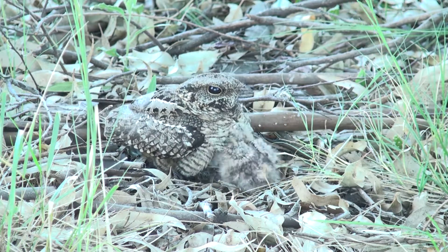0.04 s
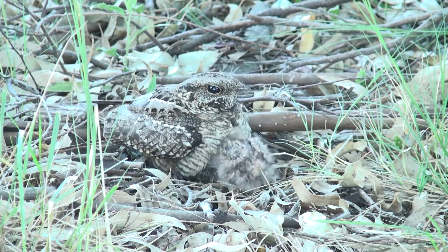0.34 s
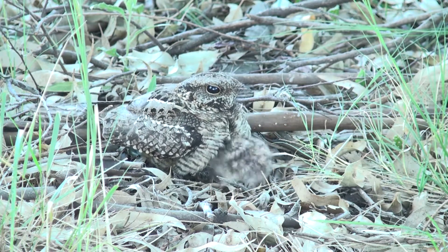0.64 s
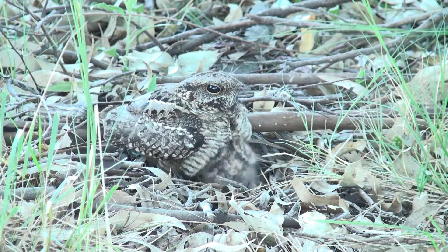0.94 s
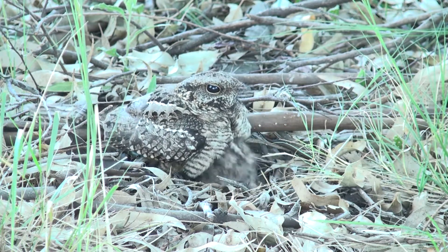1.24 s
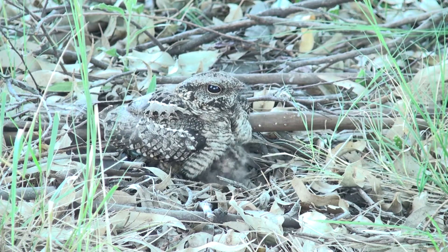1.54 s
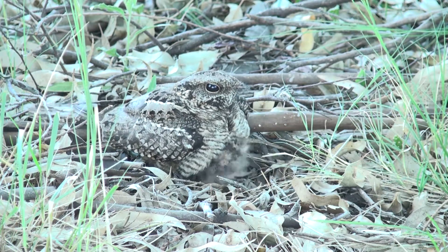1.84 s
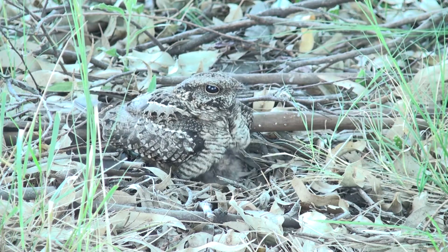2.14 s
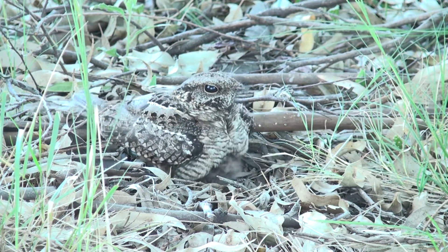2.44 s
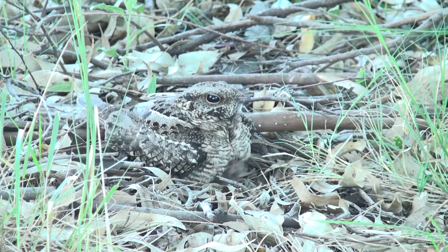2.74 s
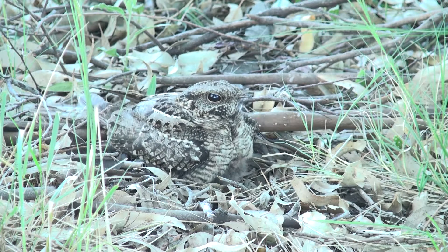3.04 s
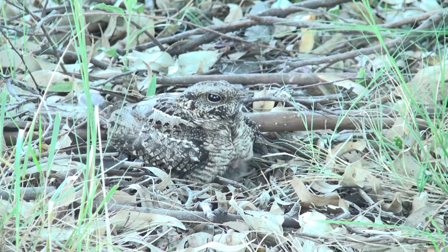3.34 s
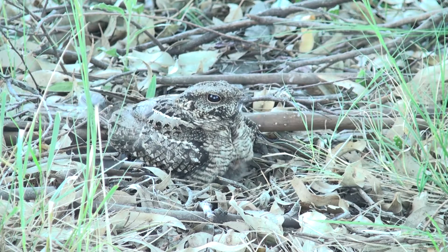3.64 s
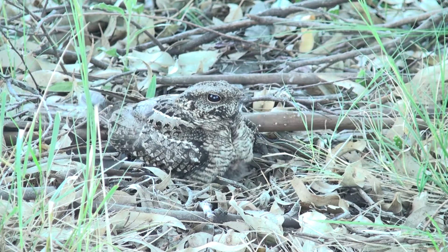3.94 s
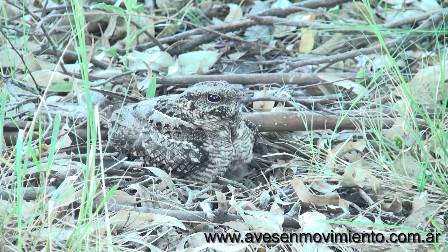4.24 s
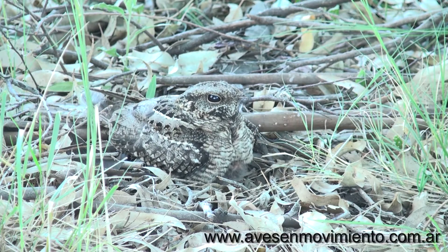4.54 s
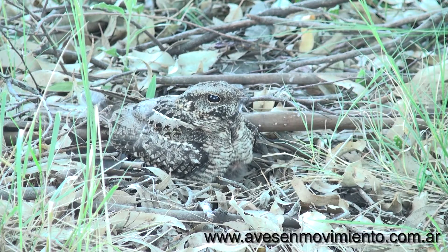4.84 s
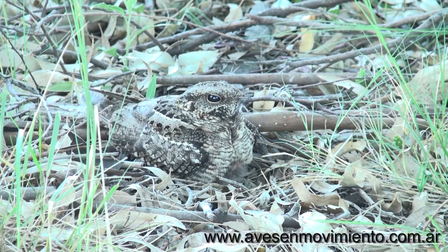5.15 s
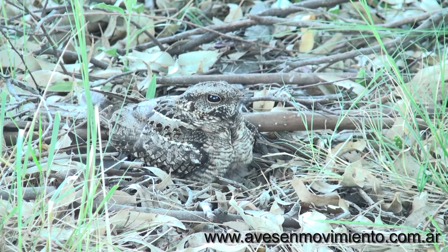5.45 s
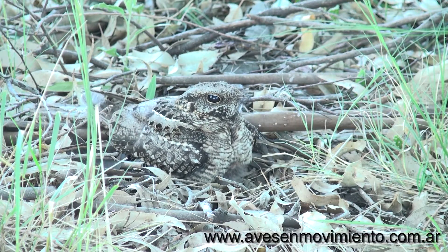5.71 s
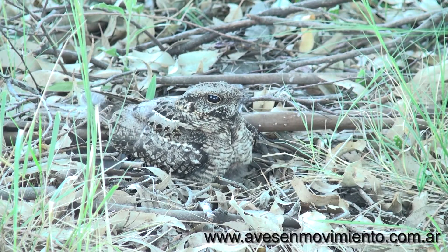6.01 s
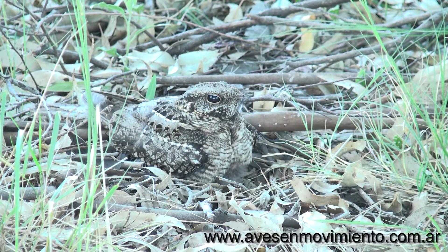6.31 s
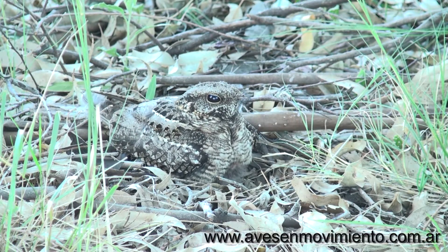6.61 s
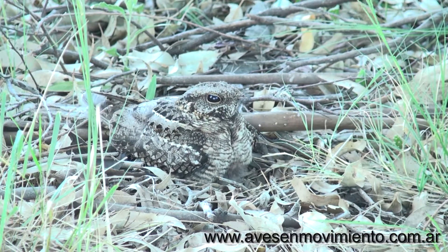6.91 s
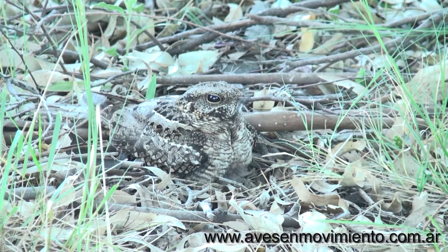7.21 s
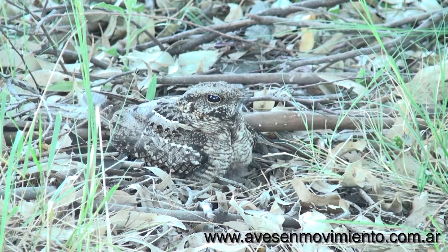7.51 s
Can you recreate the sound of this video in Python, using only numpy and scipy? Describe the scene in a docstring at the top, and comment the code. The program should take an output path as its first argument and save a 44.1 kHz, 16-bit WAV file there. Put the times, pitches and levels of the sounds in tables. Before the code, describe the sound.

Faint far birds whistle and trill over steady insects, then a nearby bird clucks rapidly as a light breeze rumbles.

```python
"""Nightjar on the woodland floor

Close to the microphone, a nightjar on the leaf litter gives eleven quick, arching clucks: pulses of
its syrinx ringing in the throat. Before it, far birds whistle and trill. A cricket, an insect chorus
and a faint low drone carry on throughout, and in the second half a breeze rumbles on the microphone."""
import sys
import numpy as np
from scipy import signal
from scipy.fft import rfft, irfft, next_fast_len
from scipy.io import wavfile
from scipy.ndimage import map_coordinates

SR = 44100
rng = np.random.default_rng(int(sys.argv[2]) if len(sys.argv) > 2 else 0)


def digitize_waveform(pressure):
    """Quantize a signal to 16-bit integers and store it at the path in sys.argv[1].

    Rows of a 2-D input are taken as channels; values are limited to [-1, 1].
    """
    field = np.atleast_2d(pressure).T
    bounded = np.clip(field, -1, 1)
    quanta = np.round(bounded * 32767).astype(np.int16)
    wavfile.write(sys.argv[1], SR, quanta)


N = 338247

# Reverberation among the trees. Each row: frequency in Hz, seconds to die away by 60 dB.
TREE_DECAY = [(300, 1), (4000, 0.45), (8000, 0.47), (15000, 0.53)]
# Diffuse sound at the microphone. Each row: frequency in Hz, left-right correlation.
DIFFUSE_LIKENESS = [(60, 0.26), (150, 0.57), (380, 0.63), (950, 0.085), (2380, -0.077), (5980, 0.27),
                    (15000, 0.26)]


def nightjar(notch_hz=4385, notch_width_hz=36, notch_depth=0.79):
    """Close by, clucks ring in the bird's throat; the leaf litter and the trees answer."""
    # Each row: start, rise time and end in seconds, nominal top pitch in Hz, relative level in dB,
    # pitch drift across the cluck as a share, swell across it in dB.
    clucks = [(5.078, 0.015, 5.204, 2236, -14, 0.049, 4.5), (5.302, .015, 5.409, 2265, -12.5, -0.027, 6),
              (5.541, .018, 5.645, 2234, -12, -0.02, -5), (5.793, 0.019, 5.901, 2192, -13, 0.014, -0.5),
              (6.048, 0.021, 6.154, 2197, -11, -0.023, -2), (6.295, 0.017, 6.402, 2190, -11, 0, -2.5),
              (6.542, 0.019, 6.652, 2156, -11.5, 0.013, -0.5), (6.779, 0.018, 6.887, 2142, -12, .02, -3),
              (7.010, 0.02, 7.121, 2129, -10, -.015, -2.5), (7.256, 0.02, 7.360, 2103, -12.5, 0.021, 0.5),
              (7.515, 0.015, 7.616, 1945, -12, -0.11, -1.5)]
    # Resonance of the throat and open bill. Each row: frequency in Hz, gain in dB.
    throat = [(500, -14), (1200, -15.5), (1700, -16.5), (2200, -17.5), (2550, -12.5), (3100, -0.5),
              (3550, -1.5), (4200, 1), (4550, -1.2), (4900, -8), (5400, -14.5), (6500, -13), (7400, -23),
              (8700, -22.5), (10500, -33.5), (13000, -30.5), (15000, -33.5), (16000, -63)]
    # Echo off the leaf litter. Each row: frequency in Hz, seconds to die away by 60 dB.
    litter_decay = [(300, 0.27), (4000, 0.088), (8000, 0.13), (15000, 0.12)]
    # Dry leaves throw back the short waves best. Each row: frequency in Hz, gain in dB.
    leaf_echo = [(2000, -8.5), (3200, -4), (3900, -6), (4400, -10), (5400, 1.5), (6500, -5.5),
                 (10000, 5), (14000, -9)]
    # The microphone's two ports. Each row: frequency in Hz, left minus right in dB.
    balance = [(2000, 1), (3600, 3.5), (4000, -1), (4230, 1.5), (4450, 2), (6500, 1), (8700, -4.5),
               (14000, -4.5)]
    # Each row: frequency in Hz, radians by which the left port leads.
    lead = [(1000, 0.27), (2150, 0.39), (4400, -0.35), (6500, -0.45), (8800, -1.2), (12000, -0.026)]

    def direct_path(hz):
        """The strongest partial dips as it glides through a narrow notch; each port hears its share."""
        damping = 1j * hz * notch_width_hz
        notch = 1 - notch_depth * damping / (notch_hz ** 2 - hz ** 2 + damping)
        sides = np.array([[0.5], [-0.5]])
        return notch * amp(sides * along(balance, hz)) * np.exp(1j * sides * along(lead, hz))

    syrinx = np.zeros(N)
    for start_s, rise_s, end_s, top_hz, db, drift, swell_db in clucks:
        add(syrinx, start_s, amp(db) * cluck(end_s - start_s, rise_s, top_hz, drift, swell_db))
    voice = resonate(syrinx, throat)
    thrown = filtered(voice, lambda hz: amp(along(leaf_echo, hz)))
    litter = scatter(thrown, litter_decay, delay_s=0.000989)
    trees = amp(-14.5) * scatter(thrown, TREE_DECAY, delay_s=0.018)
    return filtered(voice, direct_path) + litter + trees


def cluck(length_s, rise_s, top_hz, drift, swell_db, tilt_db=1.46, jitter=0.064, shimmer_db=5, rasp=0.3):
    """Syrinx pulses speed up from clicks into a clean tone, then slow down and roughen."""
    t = np.arange(int(length_s * SR)) / SR
    share, effort_db, rough, treble_db = syrinx_tension(t, rise_s)
    place = t / length_s - 0.5
    sag = 0.03 * (2 * place) ** 2  # the crest is a shallow dome
    pitch = top_hz * share * (1 + drift * place - sag + jitter * rough * wobble(700.6, len(t)))
    phase = 2 * np.pi * (np.cumsum(pitch) / SR - pitch[0] * 0.001)
    harmonic = np.arange(1, 33)[:, None]
    octaves = np.log2(harmonic * pitch / (2 * top_hz))
    partials = (harmonic * pitch < SR / 2) * amp(tilt_db * octaves + treble_db * np.maximum(octaves, 0))
    partials[2:8] *= amp([wobble(119.6, len(t)) for _ in range(6)])  # six overtones waver separately
    pulses = (partials * np.cos(harmonic * phase)).sum(axis=0)
    air_band = signal.butter(2, [3800, 8500], "bandpass", fs=SR)
    air = unit(signal.lfilter(*air_band, rng.standard_normal(len(t))))
    hiss = rasp * np.sqrt(rough) * share * (1 + np.cos(phase)) * air  # air escapes once a cycle
    waver_db = shimmer_db * rough * wobble(900, len(t)) + 0.6 * wobble(88.4, len(t))
    release = np.minimum((length_s - t) / 0.0014, 1)
    return share * amp(effort_db + swell_db * place + waver_db) * release * (pulses + hiss)


def syrinx_tension(t, rise_s, fall_s=0.026, fall_per_s=23, knee_s=0.00302, click_part=0.5):
    """Tension sets share of top pitch, effort, roughness and treble: slow clicks, a leap, a fall."""
    left_s = t[-1] - t
    rise_slack = np.minimum(0.22 * np.exp(1.9 * (1 - t / rise_s)), 0.9)
    fall_slack = fall_per_s * knee_s * np.logaddexp(0, (fall_s - left_s) / knee_s)  # a ramp, eased in
    slack = np.clip(rise_slack + fall_slack, 0, 0.9)
    voiced = np.clip((t / rise_s - click_part) / 0.12 + 0.5, 0, 1)  # clicks give way to tone mid-rise
    share = voiced * (1 - slack) + (1 - voiced) * 0.13
    click_db = np.interp(t / rise_s, [0, click_part], [-9, 1])
    effort_db = -31.5 * voiced * slack ** 2 + (1 - voiced) * click_db
    rough = 0.07 + 0.53 * np.tanh(slack / 0.34)  # clean on the crest, rough at the foot
    # Slack pulses close softly and are dull; those at the downturn snap shut and are bright.
    snap_db = 5 * np.exp(-((left_s - fall_s + knee_s) / 0.016) ** 2)
    treble_db = snap_db - 13.5 * rise_slack - 25 * fall_slack  # per octave
    return share, effort_db, rough, treble_db


def far_birds():
    """Slurred whistles and a trill, blurred by the wood; the trill comes from deeper in the trees."""
    # One bird's falling whistles. Each row: start and length in seconds, relative level and fade in dB.
    whistles = [(1.401, .265, -32.5, 21.5), (3.648, .235, -32.5, 26.5)]
    # Other birds' slurred notes. Each row: start and length in seconds, first and last pitch in Hz,
    # relative level and swell in dB.
    slurs = [(.81, 0.079, 3660, 3505, -54, -3), (2.67, 0.24, 3820, 4830, -52, 8),
             (3.102, .225, 7780, 3750, -49, 7), (4.716, .043, 4600, 3850, -43.5, 4)]
    song = np.zeros(N)
    for start_s, length_s, db, fade_db in whistles:
        add(song, start_s, amp(db) * slur(length_s, 3260, 2720, bend=1.7, fade_db=fade_db))
    for start_s, length_s, from_hz, to_hz, db, swell_db in slurs:
        add(song, start_s, amp(db) * slur(length_s, from_hz, to_hz, bend=2.6, fade_db=-swell_db))
    trill = sparrow_trill()
    trees = scatter(amp(-6) * song + amp(-2) * trill, TREE_DECAY, delay_s=0.0071)
    return (song + trill) * amp([[1], [-3]]) + trees


def sparrow_trill(start_s=3.374, step_s=0.0682, count=12):
    """A far sparrow's even run of falling notes, softer at both ends; no two are quite as loud."""
    notes = np.zeros(N)
    for i, place in enumerate(np.linspace(-1, 1, count)):
        db = -44.5 - 3 * place ** 6 + rng.standard_normal()
        note = slur(0.04, 6000, 3600, bend=2.3, fade_db=2.5, edge_s=0.004)
        add(notes, start_s + i * step_s, amp(db) * note)
    return notes


def slur(length_s, from_hz, to_hz, bend, fade_db, edge_s=0.026):
    """A pure whistle that glides and levels off."""
    t = np.arange(int(length_s * SR)) / SR
    glide = np.expm1(-bend * t / length_s) / np.expm1(-bend)
    phase = 2 * np.pi * np.cumsum(from_hz + (to_hz - from_hz) * glide) / SR
    gate = np.clip(np.minimum(t, length_s - t) / edge_s, 0, 1)
    return gate * amp(-fade_db * t / length_s + 1.7 * wobble(37, len(t))) * np.sin(phase)


def breeze(middling_db=-42, eddy_db=1.8, eddies_per_s=12):
    """Eddies buffet the two microphone ports unequally, and the grass hisses faintly."""
    # Each row: time in seconds, strength of the breeze in dB.
    gusts = [(4.15, -55), (4.3, -45.5), (4.55, -62), (4.78, -41.5), (4.9, -47), (5.04, -39), (5.26, -46),
             (5.38, -40), (5.55, -45), (6.1, -48), (6.22, -41), (6.36, -48.5), (6.58, -36), (6.76, -41),
             (6.88, -35), (7.05, -39), (7.3, -36), (7.6, -36.7)]
    # Spectra of the three layers. Each row: frequency in Hz, relative level in dB.
    rumble_colour = [(20, -19), (40, -8.5), (70, -11), (100, -1.5), (130, -10), (180, -31), (600, -100)]
    flutter_colour = [(80, -30), (135, 2), (190, 0), (280, -11), (450, -24), (2000, -79)]
    grass_colour = [(300, -1), (800, 5), (2500, 0.5), (7000, 0.5), (10000, -3.5), (15000, -15)]
    t = np.arange(N) / SR
    gust_db = np.interp(t, *np.transpose(gusts)) - middling_db
    arrival = np.clip((t - 4.1) / 0.19, 0, 1)
    # A stronger breeze sheds smaller, faster eddies, so the flutter grows more than the rumble.
    rumble_db = -42 + 0.94 * gust_db + eddy_db * wobble(eddies_per_s)
    rumble = amp(rumble_db) * rush(rumble_colour, likeness=[(100, 0.14)])
    flutter_db = -45 + 1.49 * gust_db + eddy_db * wobble(eddies_per_s)
    flutter = amp(flutter_db) * rush(flutter_colour, likeness=[(200, 0.032)])
    grass = amp(-51 + 0.15 * gust_db + 0.92 * wobble(16)) * rush(grass_colour, DIFFUSE_LIKENESS)
    return arrival * (rumble + flutter + grass)


def cricket(strokes_per_s=12.18, first_s=0.012, pitch_hz=4750, sweep_hz=330):
    """A cricket off to the left: each wing stroke is a short, slightly rising tone."""
    stroke = ((np.arange(N) / SR - first_s) * strokes_per_s + 0.5) % 1 - 0.5
    phase = 2 * np.pi * np.cumsum(pitch_hz + sweep_hz * stroke + 14 * wobble(150)) / SR
    envelope = np.exp(-(stroke / 0.25) ** 2) * amp(1.2 * wobble(5))
    chirp = envelope * (np.sin(phase) + amp(-23) * np.sin(2 * phase))
    return chirp * amp([[-45], [-55]]) + amp(-60) * scatter(chirp, TREE_DECAY, delay_s=0.0086)


def wood_ambience():
    """Soft air all round the microphone, a chorus of far insects and a distant low drone."""
    # Spectra of the three layers. Each row: frequency in Hz, relative level in dB.
    air_colour = [(25, -2), (70, -1.5), (160, -1), (250, -1.5), (450, 1.5), (1000, -0.5), (2000, -6),
                  (3200, -8), (6000, -8), (8000, -11), (11000, -16), (13000, -19.5), (16000, -28)]
    chorus_colour = [(3000, -34), (3600, -13), (3950, -3), (4600, 1), (5000, -4), (5500, -14), (7000, -35)]
    drone_colour = [(60, -43.5), (88, -10.5), (108, 1.5), (118, -2), (132, -53), (200, -60), (500, -120)]
    air = amp(-47.5 + 0.071 * wobble(3.5)) * rush(air_colour, DIFFUSE_LIKENESS)
    chorus = amp(-50 + 0.46 * wobble(1.7) + 0.86 * wobble(25)) * rush(chorus_colour, DIFFUSE_LIKENESS)
    drone = amp(-54 + 0.46 * wobble(2.86)) * rush(drone_colour, likeness=[(100, 1)])
    return air + chorus * amp([[1], [-1]]) + drone


def scatter(x, decay, delay_s):
    """Diffuse stereo echo; each frequency dies at its own speed."""
    hz, t, noise = signal.stft(rng.standard_normal((2, SR // 2)), SR, nperseg=128)
    tail = signal.istft(noise * amp(-60 * t / along(decay, hz)[:, None]), SR, nperseg=128)[1]
    delayed = np.pad(x, (round(delay_s * SR), 0))
    return signal.fftconvolve(delayed[None], tail / np.linalg.norm(tail[0]), axes=1)[:, :N]


def rush(colour, likeness):
    """Stereo noise of rms 1 with a given colour and left-right correlation."""
    def mid_side_gains(hz):
        angle = np.arccos(np.clip(along(likeness, hz), -1, 1)) / 2
        return amp(along(colour, hz)) * [np.cos(angle), np.sin(angle)]

    mid, side = filtered(rng.standard_normal((2, N)), mid_side_gains)
    return unit(np.array([mid + side, mid - side]))


def resonate(x, colour, size=2048):
    """Causal filter with the given (Hz, dB) colour."""
    cepstrum = irfft(np.log(amp(along(colour, np.fft.rfftfreq(size, 1 / SR)))))
    cepstrum[1:size // 2] *= 2
    cepstrum[size // 2 + 1:] = 0
    return signal.fftconvolve(x, irfft(np.exp(rfft(cepstrum))))[:N]


def filtered(x, response):
    """Multiply the spectrum of x by a function of frequency."""
    size = next_fast_len(N + SR // 2)
    return irfft(rfft(x, size) * response(np.fft.rfftfreq(size, 1 / SR)), size)[..., :N]


def wobble(rate, size=N):
    """A smooth random curve, rate knots a second."""
    knots = rng.standard_normal(int(size * rate / SR) + 4)
    return map_coordinates(knots, [np.arange(size) * rate / SR])


def along(points, hz):
    """Read (Hz, value) points on a log frequency axis."""
    point_hz, values = np.transpose(points)
    return np.interp(np.log(hz + 1), np.log(point_hz), values)


def add(track, start_s, sound):
    """Mix a sound into a track."""
    part = track[round(start_s * SR):][:len(sound)]
    part += sound[:len(part)]


def amp(db):
    """Decibels to gain."""
    return 10 ** (np.asarray(db) / 20)


def unit(x):
    """Scale to rms 1."""
    return x / np.sqrt(np.mean(x ** 2) + 1e-20)


def scene():
    """All sources at the microphone."""
    return nightjar() + far_birds() + cricket() + wood_ambience() + breeze()


def record(dry):
    """The recorder keeps nothing above its band limit."""
    return filtered(dry, lambda hz: hz < 15850)


dry = scene()
out = record(dry)
digitize_waveform(out)
```